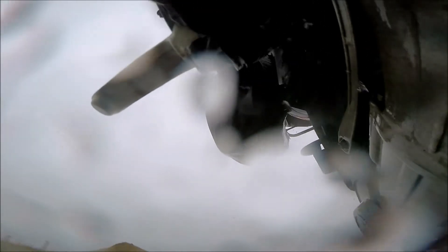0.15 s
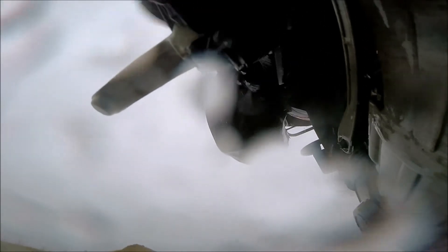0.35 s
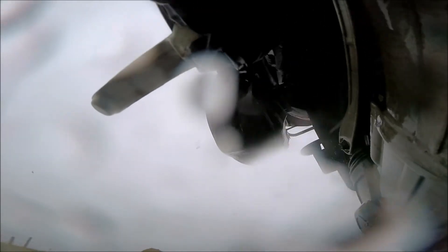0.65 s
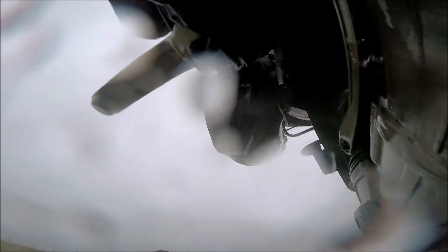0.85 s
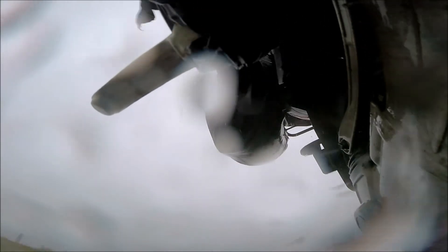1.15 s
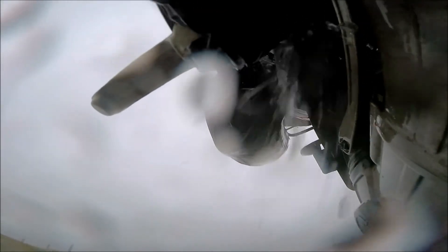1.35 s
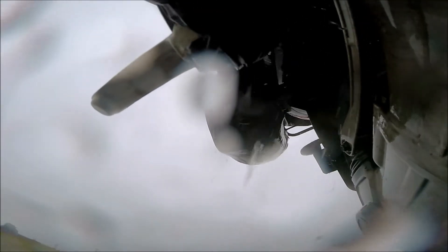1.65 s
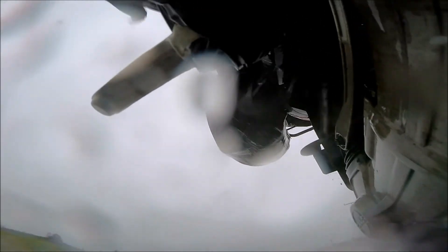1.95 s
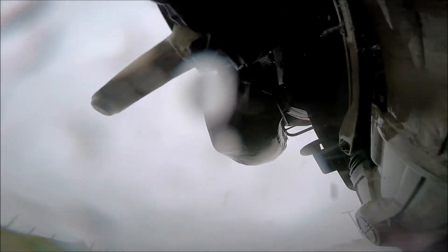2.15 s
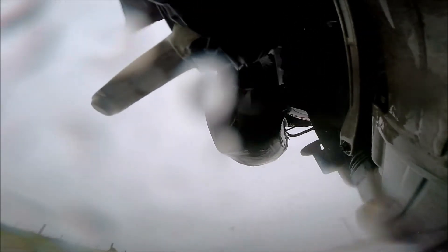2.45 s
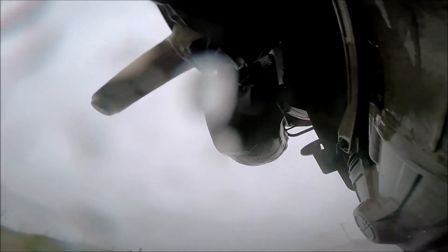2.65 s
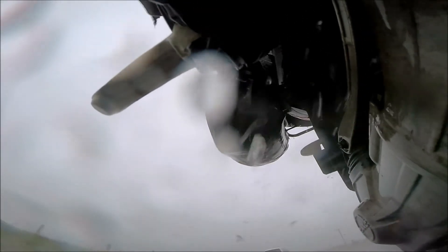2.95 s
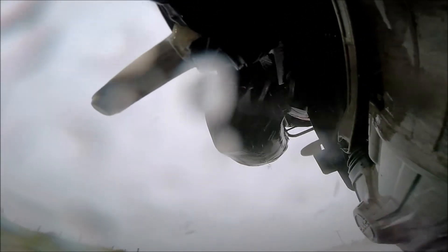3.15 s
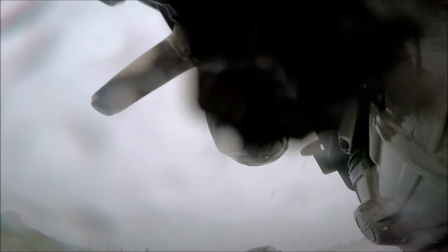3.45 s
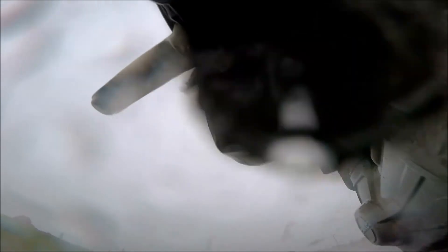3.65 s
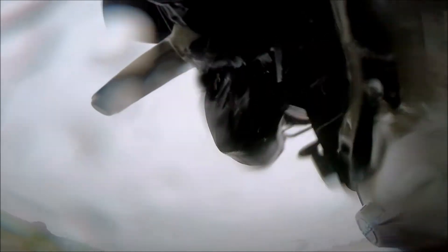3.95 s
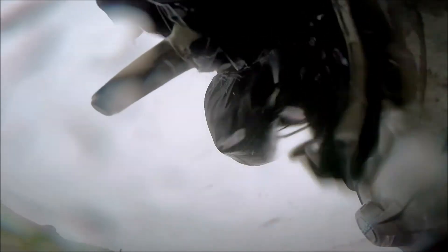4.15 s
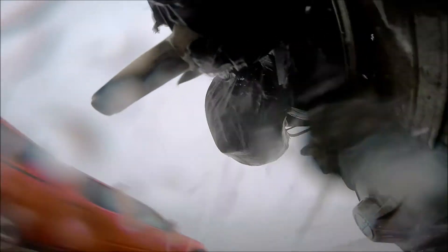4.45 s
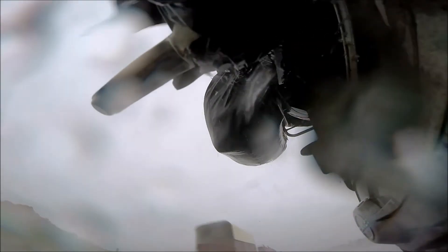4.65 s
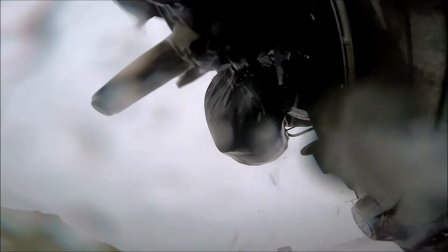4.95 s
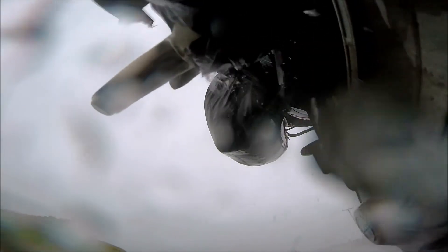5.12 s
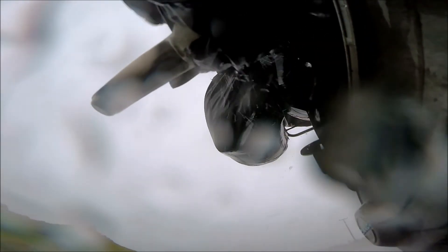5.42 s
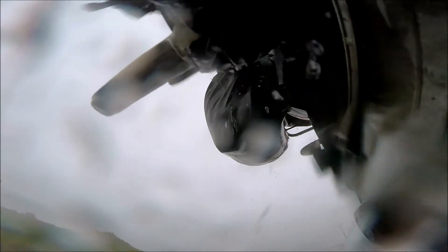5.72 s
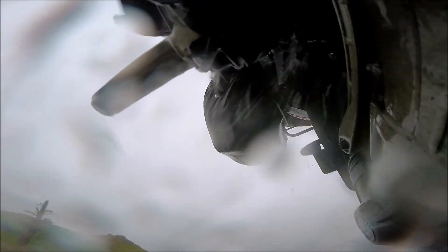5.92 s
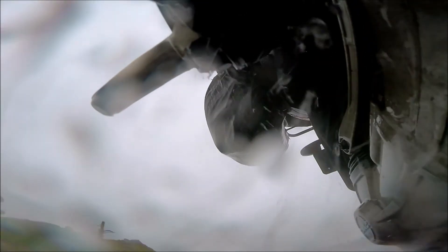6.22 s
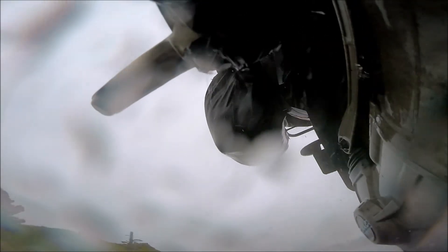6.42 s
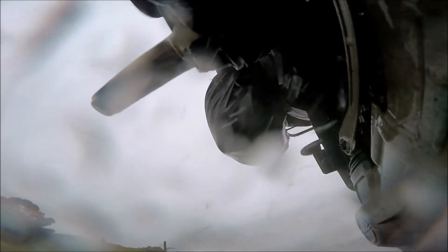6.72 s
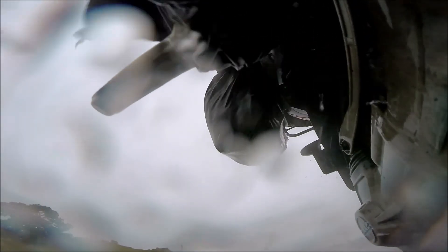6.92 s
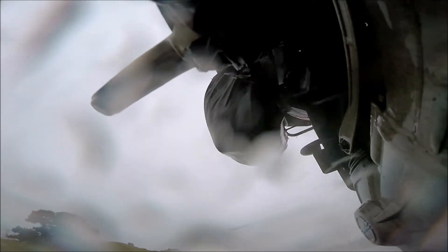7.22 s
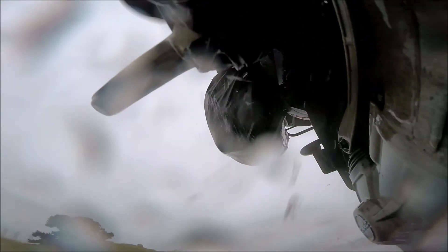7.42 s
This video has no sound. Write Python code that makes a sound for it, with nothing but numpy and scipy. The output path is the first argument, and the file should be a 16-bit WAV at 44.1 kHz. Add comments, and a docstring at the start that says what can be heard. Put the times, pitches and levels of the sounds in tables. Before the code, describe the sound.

Close motorcycle engine drone at cruising speed, with gear whine, tyre spray and a few chain slaps, gradually growing quieter.

```python
"""A V-twin motorcycle booms along a wet road, heard close up from a microphone low on its frame. Each engine
cycle booms once in the pipe, knocks twice in the block and rattles the valve gear. The drive whines in a rush
of tyre and spray, and short hard rasps sound now and then. Wind buffets the frame and drops tick on the
housing; the whole sound slowly fades."""
import sys
import numpy as np
from scipy import signal
from scipy.fft import rfft, irfft
from scipy.io import wavfile

SR = 44100
rng = np.random.default_rng(int(sys.argv[2]) if len(sys.argv) > 2 else 0)


def to_wav(s):
    """Save 16-bit WAV."""
    ch = np.atleast_2d(s).T  # columns
    pcm = np.round(np.clip(ch, -1, 1) * 32767)  # PCM
    wavfile.write(sys.argv[1], SR, pcm.astype(np.int16))


N = 334278
T = np.arange(N) / SR


def gain_of(db):
    return 10 ** (np.asarray(db) / 20)


def unit_rms(x):
    return x / np.sqrt(np.mean(x ** 2) + 1e-20)


def curve(rows):
    return np.interp(T, *np.transpose(rows))


def swell(centre_s, half_s):
    """A smooth rise and fall of height 1."""
    return np.exp(-((T - centre_s) / half_s) ** 2)


def drift(hz):
    """A random wander of rms 1, up to about hz."""
    f = np.fft.rfftfreq(N, 1 / SR)
    return unit_rms(irfft(rfft(rng.standard_normal(N)) / (1 + (f / hz) ** 4), N))


def colour(x, points, size=16384):
    """Rings x through a causal body with the given response."""
    hz, db = np.transpose(points)
    f = abs(np.fft.fftfreq(size, 1 / SR))
    log_gain = np.log(gain_of(np.interp(np.log(f + 1), np.log(hz), db)))
    response = np.fft.ifft(np.exp(np.conj(signal.hilbert(log_gain)))).real  # minimum phase
    return signal.oaconvolve(x, response[:size // 2])[:N]


def resonate(x, hz, width_hz):
    """One resonance of gain 1."""
    return signal.lfilter(*signal.iirpeak(hz, hz / width_hz, fs=SR), x)


def pulses(times, sizes):
    """One sharp push at each time."""
    at = np.round(times * SR).astype(int)
    inside = (at >= 0) & (at < N)
    return np.bincount(at[inside], sizes[inside], N)


def noise_tails(hits, decay_s):
    """A dying burst of noise after each hit."""
    return signal.lfilter([1], [1, -np.exp(-1 / (decay_s * SR))], hits) * rng.standard_normal(N)


def passing_times(cycles, phase):
    """The times at which the engine passes one point in its cycle."""
    return np.interp(np.arange(int(cycles[-1]) + 1) + phase, cycles, T, right=N)


def tick(hz, decay_s=0.00014):
    """A drop's tick: a few quickly dying cycles, of height about 1."""
    age = T[:128] / decay_s
    return age * np.exp(1 - age) * np.sin(2 * np.pi * hz * T[:128])


# the strongest buffets at the microphone: centre_s, boost_db
WIND_BUFFETS = [(.06, 8), (.24, 2), (.75, 7), (2.1, 10), (2.36, 5), (2.94, 5), (3.34, 8), (4.7, 7),
                (5.53, 6), (6.5, 7)]

def wind(level_db=-23.0, lumpy_db=2.0, lumps_hz=6, buffet_half_s=.08):
    """Low rumble of the air round the frame: always lumpy, with a few stronger buffets."""
    spectrum = [(12, -26.5), (25, -10), (38, -11), (50, 14.0), (60, -1.5), (80, -11),
                (200, -52.5), (1000, -90)]  # frequency_hz, gain_db
    rumble = colour(rng.standard_normal(N), spectrum)
    # the rumble is partly evened out, so that the buffets stand clear of it
    loudness = np.sqrt(signal.oaconvolve(rumble ** 2, np.hanning(8192), "same"))
    gust_db = sum(db * swell(s, buffet_half_s) for s, db in WIND_BUFFETS) + lumpy_db * drift(lumps_hz)
    return gain_of(level_db + gust_db) * unit_rms(rumble / np.sqrt(loudness))


# how much spray reaches the housing: time_s, gain_db
ROAD_WETNESS = [(0, -2), (3.3, -5), (3.8, 3.5), (5.1, 4.5), (5.7, 0.5), (7.58, -2)]

def spray(level_db=-46.5, per_s=130, spread_db=3.2, low_hz=5500, high_hz=9000, pitches=12):
    """Fine droplets of mixed size and pitch patter on the housing, harder where the road is wetter."""
    patter = np.zeros(N)
    for hz in np.geomspace(low_hz, high_hz, pitches):
        sizes = gain_of(spread_db * np.minimum(rng.exponential(1, N), 2))
        lands = rng.random(N) < per_s / pitches / SR
        patter += signal.oaconvolve(sizes * lands, tick(hz))[:N]
    return gain_of(level_db + curve(ROAD_WETNESS)) * unit_rms(patter)


# the largest drops on the housing: start_s, level_db, pitch_hz
LARGE_DROPS = [(.815, -41, 10900), (1.095, -38, 9700), (1.213, -39, 9500), (2.195, -39, 10000),
               (2.525, -39, 10500), (2.777, -42, 10000), (3.020, -39, 12000), (4.348, -42, 9500),
               (4.389, -45, 12000), (7.342, -46, 9500)]

def drops(count=22, soft_db=-26, loud_db=-21, low_hz=9200, high_hz=11500):
    """Single drops tick sharply: the largest, and middling ones at random that fade with the ride."""
    times, dbs, pitches = rng.uniform([0, soft_db, low_hz], [T[-1], loud_db, high_hz], (count, 3)).T
    faded_db = dbs + np.interp(times, *np.transpose(RIDE_FADE))
    ticks = np.zeros(N)
    for start_s, db, hz in LARGE_DROPS + list(zip(times, faded_db, pitches)):
        sound = gain_of(db) * tick(hz)
        span = ticks[round(start_s * SR):][:len(sound)]
        span += sound[:len(span)]
    return ticks


# standing water under the tyres: centre_s, half_length_s, boost_db
ROAD_PUDDLES = [(0.605, 0.089, 3), (2.14, 0.058, 2), (2.92, 0.04, 1.5), (3.941, 0.11, 1.5),
                (5.117, 0.072, 2.6)]
# the rush from just above the road: frequency_hz, gain_db
RUSH_SPECTRUM = [(60, -15), (340, -19), (430, -14.5), (690, -15.5), (780, -8), (860, -5), (1060, -12),
                 (1140, 0), (1270, -2), (1690, 1), (1900, -13.5), (2500, -22.5), (5000, -39.5),
                 (11000, -56.5), (15000, -64)]

def road_rush(cycles, level_db=-1.75, road_db=0.47, throb_db=-0.1, flutter_db=0.97):
    """Tyre, chain and spray: a fluttering rush that swells in each puddle."""
    surge_db = sum(db * swell(s, half_s) for s, half_s, db in ROAD_PUDDLES) + road_db * drift(3.8)
    surge_db += throb_db * np.cos(4 * np.pi * (cycles - .17))  # a faint throb each turn of the crank
    surge_db += flutter_db * drift(110)
    hiss = gain_of(surge_db) * rng.standard_normal(N)
    return gain_of(level_db) * unit_rms(colour(hiss, RUSH_SPECTRUM))


# short hard rasps: start_s, level_db
RASPS = [(.690, -5.5), (.9125, -6), (1.083, -14), (6.492, -19), (6.9205, -17)]

def rasps(pitch_hz=1480, width_hz=380):
    """Short hard rasps ring near 1.5 kHz for a few milliseconds."""
    times, db = np.transpose(RASPS)
    ring = pulses(times, gain_of(db))
    for _ in range(3):
        ring = resonate(ring, pitch_hz, width_hz)
    return gain_of(db.max()) * ring / abs(ring).max()


# tones of the meshing gears: multiple_of_cycle_rate, gain_db
GEAR_TONES = [(41.15, 0), (16, -16), (37, -11), (38, -12), (46, -11), (82.3, -30)]

def gear_whine(cycles, level_db=-11.0, waver_db=1.5, lash_rad=0.24):
    """Meshing teeth sing at fixed multiples of engine speed and waver with the slack in the drive."""
    tones = np.zeros(N)
    for multiple, db in GEAR_TONES:
        strength = gain_of(db + waver_db * drift(3.9))
        tones += strength * np.sin(2 * np.pi * multiple * cycles + lash_rad * drift(12))
    strain_db = curve([(0, 1.5), (1.1, 4.2), (4, 4.2), (7.5, 4.8)])
    return gain_of(level_db + strain_db) * unit_rms(tones)


# valves shutting and pistons slapping: phase_cycles, gain_db, decay_s
VALVE_CLACKS = [(.005, -4, .0009), (.052, -1.5, 0.0014), (.19, -4, 0.001), (0.234, -10.5, .0008),
                (.292, 0, 0.00051), (.675, -7, 0.00074), (.745, -2.5, 0.0017)]
# ringing of the metal cases: pitch_hz, width_hz, gain_db
CASE_MODES = [(2730, 90, 10.5), (3580, 100, 7), (4270, 200, 5)]
# the cases' response to clatter, close up: frequency_hz, gain_db
CASE_RESPONSE = [(500, -6), (1000, 9), (1650, 11.5), (1900, 1.5), (2200, 3.5), (2480, -12.5), (3000, -6),
                 (4400, -12), (4700, -15.5), (5400, -13), (6800, -26), (9800, -27), (12000, -38),
                 (15000, -47)]

def valve_gear(cycles, level_db=-12, uneven_db=3.5, jitter_s=.0003, rub=0.082, click=1.9):
    """Short metallic clacks at fixed points in the cycle, over a light rubbing, ring the cases."""
    clatter = rub * rng.standard_normal(N)
    for phase, db, decay_s in VALVE_CLACKS:
        times = passing_times(cycles, phase)
        late, hard = rng.standard_normal((len(times), 2)).T
        hits = pulses(times + jitter_s * late, gain_of(db + uneven_db * np.minimum(hard, 1)))
        clatter += click * hits + noise_tails(hits, decay_s)
    ringing = sum(gain_of(db) * resonate(clatter, hz, width_hz) for hz, width_hz, db in CASE_MODES)
    return gain_of(level_db) * unit_rms(colour(clatter + ringing, CASE_RESPONSE))


# the throttle eases: start_s, end_s
THROTTLE_EASING = (4.6, 5.3)
# the engine stumbles on one poorly burning cycle: time_s
STUMBLES = [1.29, 1.93, 2.86, 2.89, 4.63, 7.26, 7.48]

def combustion(cycles, cruise_spread_db=0.72, eased_spread_db=1.25, weak_share=0.14, weak_db=-3.5,
               stumble_db=-4):
    """Each cycle's strength in dB; as the throttle eases, burning gets uneven and some cycles weak."""
    starts = passing_times(cycles, 0)
    eased = np.interp(starts, THROTTLE_EASING, [0, 1])
    # gas left in the cylinder carries part of each cycle's luck over to the next
    luck = unit_rms(signal.lfilter([1], [1, -.5], rng.standard_normal(len(starts))))
    spread_db = cruise_spread_db + (eased_spread_db - cruise_spread_db) * eased
    burn_db = spread_db * np.clip(luck, -2, 2)
    burn_db += weak_db * (rng.random(len(starts)) < weak_share * eased)
    for time_s in STUMBLES:
        burn_db[np.argmin(abs(starts - time_s))] = stumble_db
    return burn_db


# the two firings, heard in both pipe and block: phase_cycles, exhaust_db, knock_db
CYLINDER_FIRINGS = [(0.013, 18, -2), (0.594, -29, -4.5)]
# the block's response to a firing, close up: frequency_hz, gain_db
BLOCK_RESPONSE = [(300, -45), (500, -13), (610, -7.5), (675, -1.5), (712, -20.5), (750, 3), (820, 4),
                  (990, 3.5), (1060, -6.5), (1650, 0.5), (1950, -26.5), (4000, -56)]

def block_knock(cycles, burn_db, level_db=-10, lead_cycles=0.0899, jitter_s=.00004):
    """The pressure rise in each cylinder thuds through the block, ahead of the exhaust pulse."""
    push = np.zeros(N)
    for phase, _, db in CYLINDER_FIRINGS:
        times = passing_times(cycles, phase - lead_cycles) + jitter_s * rng.standard_normal(len(burn_db))
        push += pulses(times[1:], gain_of(db + burn_db[1:]))
    # each mode of the casting holds back its own band, which smears the thud over a few milliseconds
    for hz, width_hz in [(760, 110), (930, 160), (1400, 200)]:
        push = push - 2 * resonate(push, hz, width_hz)
    return gain_of(level_db) * unit_rms(colour(push, BLOCK_RESPONSE))


# the exhaust pipe's response, from low on the frame: frequency_hz, gain_db
PIPE_RESPONSE = [(40, -48), (80, -36), (107, -19), (130, -8), (147, 0), (165, -5.5), (180, -9.5),
                 (214, -13.5), (250, -16.5), (285, -32), (320, -29), (355, -33), (392, -27.5), (420, -46)]

def exhaust(cycles, burn_db, level_db=-1.0, puff_db=-20, puff_s=0.032, jitter_s=.00005,
            hum_db=-16, hum_hz=153, hum_width_hz=22, muffle_hz=700):
    """Each firing sends a pulse and a puff of gas down the pipe, which booms; the flow keeps it humming."""
    push = np.zeros(N)
    for phase, db, _ in CYLINDER_FIRINGS:
        times = passing_times(cycles, phase) + jitter_s * rng.standard_normal(len(burn_db))
        push += pulses(times, gain_of(db + burn_db))
    puff = noise_tails(push, puff_s)
    boom = colour(unit_rms(push) + gain_of(puff_db) * unit_rms(puff), PIPE_RESPONSE)
    muffled = signal.sosfilt(signal.butter(2, muffle_hz, fs=SR, output="sos"), boom)
    flow = rng.standard_normal(N)
    hum = resonate(resonate(flow, hum_hz, hum_width_hz), hum_hz, hum_width_hz)
    load_db = curve([(0, 2.8), (.25, 2.4), (.55, 2), (1, 1.6), (2, 1.2),
                     (4.5, 1.5), (6.3, 1.5), (7.5, 0.5)])
    return gain_of(level_db + load_db) * (unit_rms(muffled) + gain_of(hum_db) * unit_rms(hum))


# engine speed in four-stroke cycles: time_s, rate_hz
ENGINE_SPEED = [(0, 35.504), (0.2, 35.76), (0.4, 35.729), (0.7, 35.663), (2, 35.652), (3.2, 35.68),
                (4.2, 35.631), (4.9, 35.606), (5.3, 35.485), (6, 35.347), (6.3, 35.369), (6.55, 35.255),
                (7.05, 35.137), (7.58, 35.293)]
# the ride's slow fade at the microphone: time_s, gain_db
RIDE_FADE = [(0, -19.5), (.7, -19), (2, -19.5), (3.2, -21.5), (4.8, -24), (5.5, -25.5), (6.3, -27),
             (7.58, -31)]

def scene():
    """From low on the frame: engine, road and wind fade together; rasps and drops have their own levels."""
    cycles = np.cumsum(curve(ENGINE_SPEED)) / SR
    burn_db = combustion(cycles)
    engine = exhaust(cycles, burn_db) + block_knock(cycles, burn_db)
    engine += valve_gear(cycles) + gear_whine(cycles)
    ride = gain_of(curve(RIDE_FADE)) * (engine + road_rush(cycles) + spray() + wind())
    return (ride + rasps() + drops())[None]


def record(dry, edge_hz=15000):
    """One microphone, with the treble cut off above edge_hz."""
    lowpass = signal.firwin(511, edge_hz, window=("kaiser", 9), fs=SR)
    return signal.oaconvolve(dry, lowpass[None], "same")


dry = scene()
out = record(dry)
to_wav(out)
```